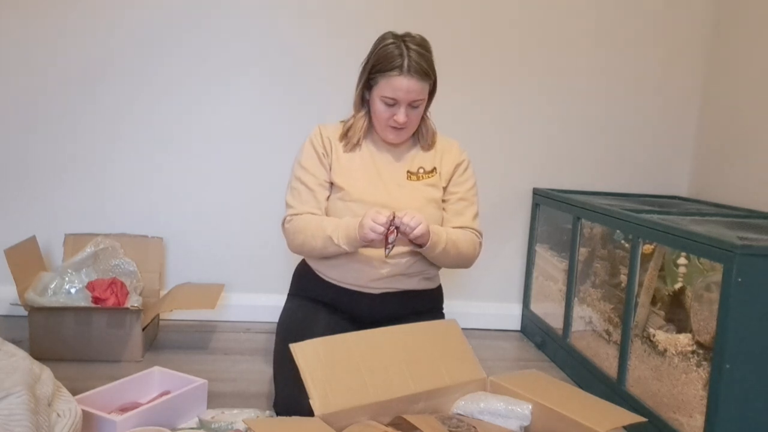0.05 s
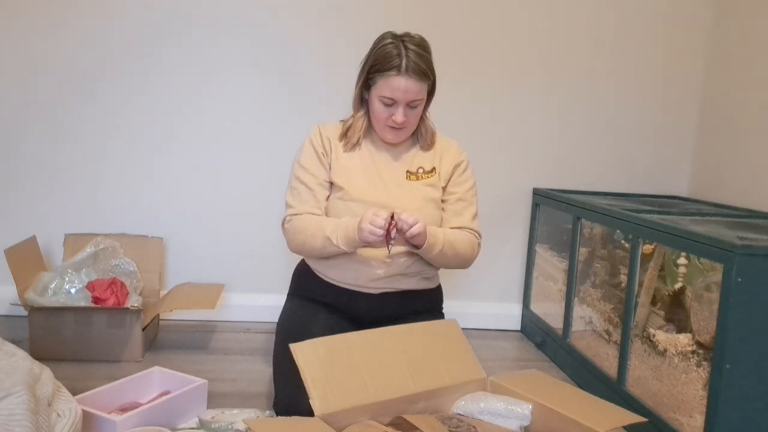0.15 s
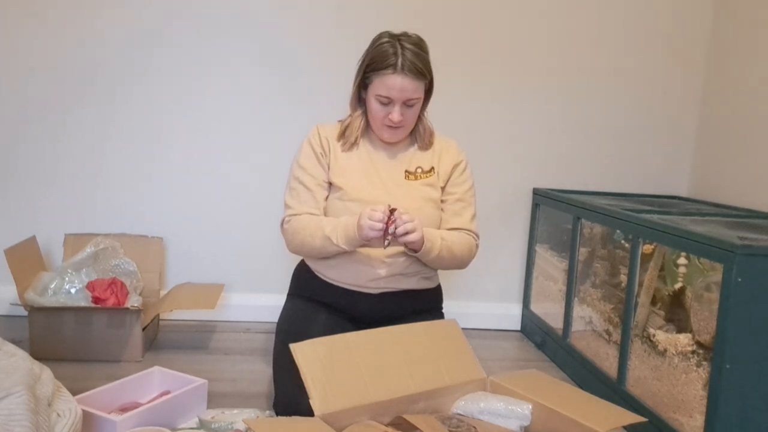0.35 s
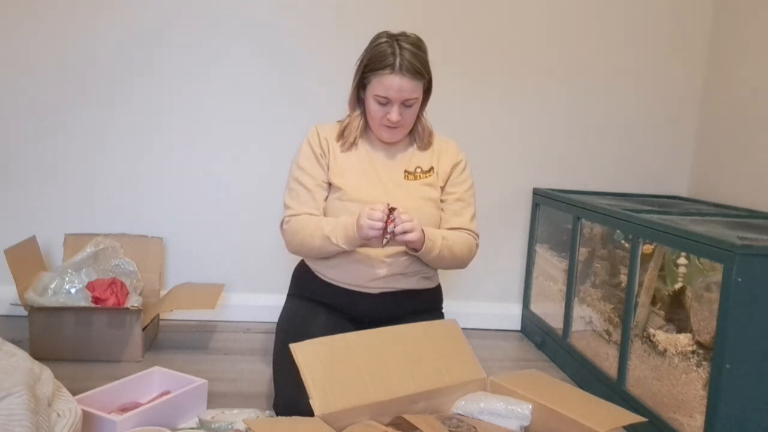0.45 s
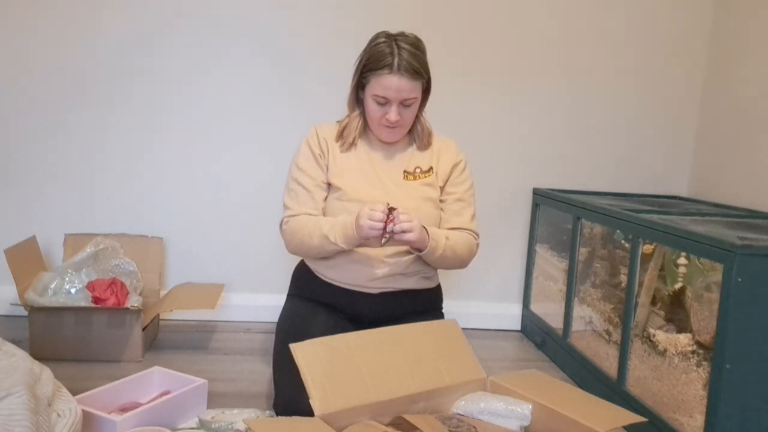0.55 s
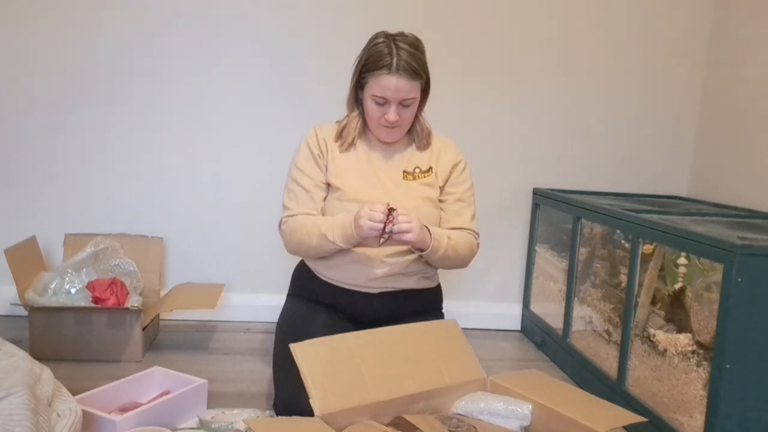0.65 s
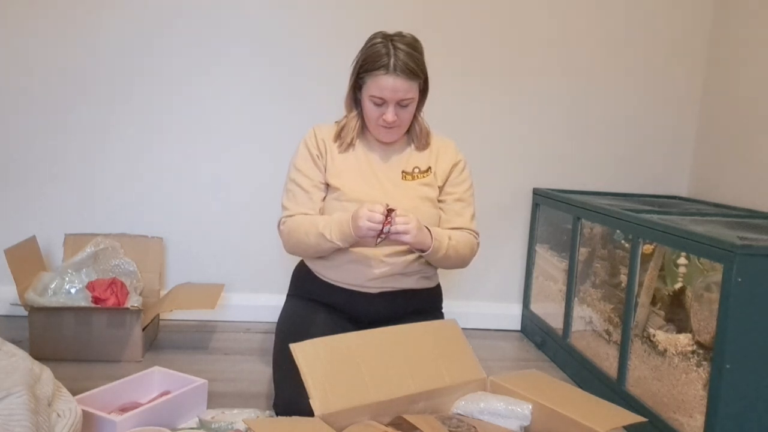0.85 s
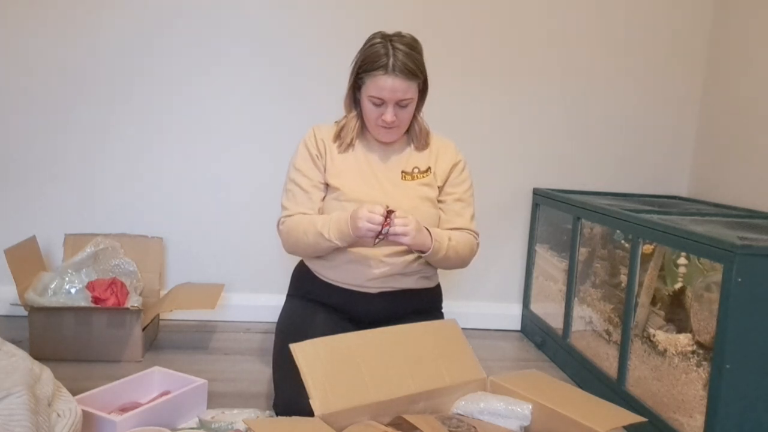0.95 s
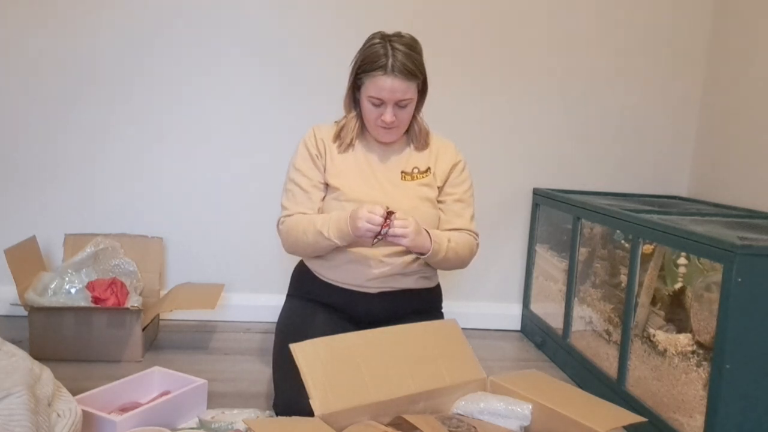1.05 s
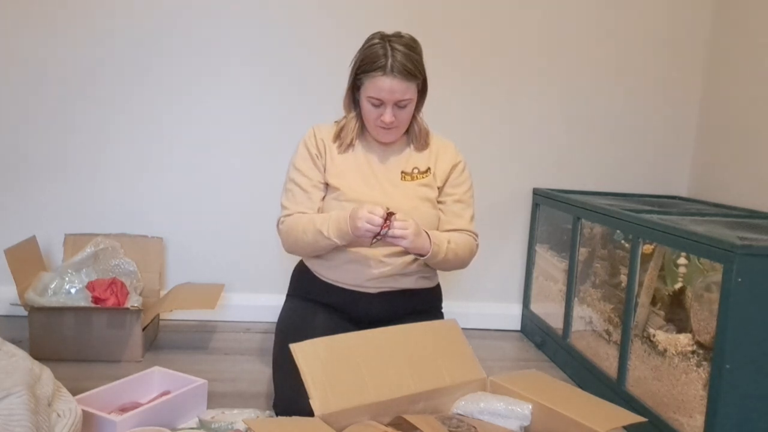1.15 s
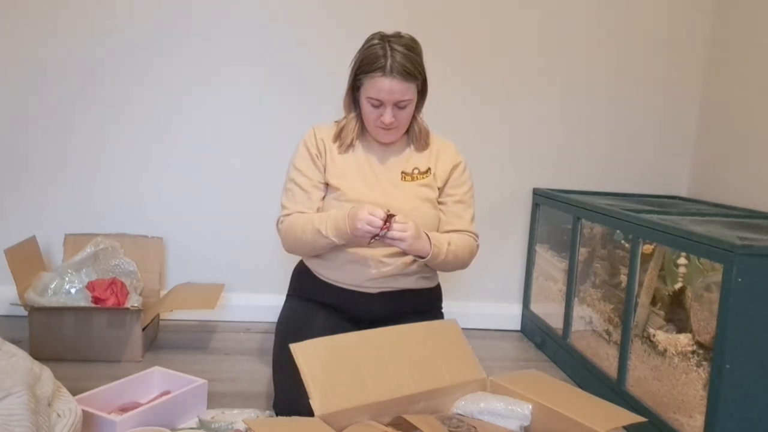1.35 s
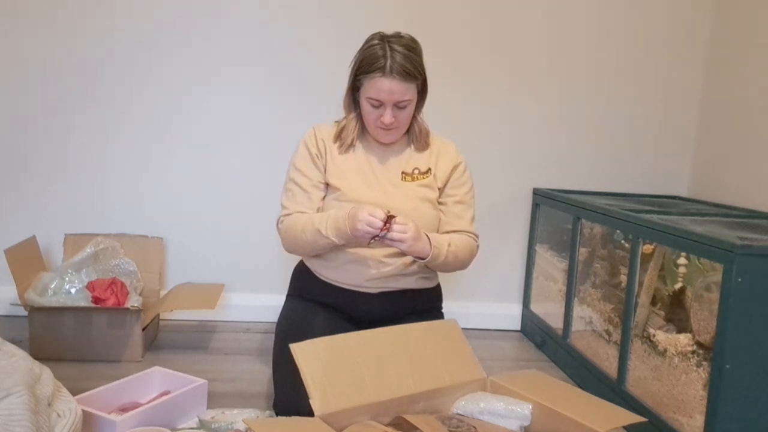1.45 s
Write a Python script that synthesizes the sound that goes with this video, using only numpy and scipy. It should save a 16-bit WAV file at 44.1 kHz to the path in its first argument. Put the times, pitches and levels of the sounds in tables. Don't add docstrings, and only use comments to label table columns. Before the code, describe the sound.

A small plastic packet is opened by hand: faint ticks, a quick burst of crisp pops, scattered crinkles, one loud late snap, then near quiet. Bare reverberant room, low rumble and faint hiss, stereo camera microphones about two metres away.

```python
import sys
import numpy as np
from scipy import signal
from scipy.fft import rfft, irfft
from scipy.io import wavfile

SR = 44100
rng = np.random.default_rng(int(sys.argv[2]) if len(sys.argv) > 2 else 0)


def transcribe(u):
    v = np.clip(np.atleast_2d(u).T, -1, 1)
    q = np.round(v * 32767).astype(np.int16)
    wavfile.write(sys.argv[1], SR, q)


def to_linear_factor(level_db):
    exponent = np.asarray(level_db, float) / 20
    return 10 ** exponent


N = 66150
HZ = np.fft.rfftfreq(1024, 1 / SR)

# time_s, level_db
RUMBLE_SWELL = [(0.0, -77), (0.032, -68.5), (0.188, -69), (0.228, -60.5), (0.33, -71), (0.366, -63),
                (0.546, -57.5), (0.63, -71), (0.7, -65.5), (0.894, -75.5), (0.922, -69), (1.202, -71),
                (1.252, -77.5), (1.282, -69.5), (1.416, -78), (1.436, -82.5), (1.5, -67.5)]
# pitch_hz, width_hz, level_db
RUMBLE_MODES = [(55, 24, -6.5), (69.2, 10.2, -4), (105, 36, -14), (146, 8.8, -7), (286, 256, -20)]
# pitch_hz, level_db
HUSH_COLOUR = [(200, 9), (700, 3), (1100, -6), (2000, -11.5), (3200, -13), (6000, -12.5), (9000, 0.5),
               (16000, -13)]
# pitch_hz, likeness (0 to 1)
LIKENESS = [(60, 0.85), (180, 1), (550, 0.57), (1650, 0.08), (4970, 0.017), (15000, 0.061)]
# time_s, level_db, dullness (0 to 1)
PULL = [(0, -55, 0.33), (0.021, -74, 0.87), (.18, -73.5, 0.7), (.205, -55.5, 0.86), (.26, -46.5, 0.33),
        (0.303, -47.5, 0.4), (.33, -71, 0.87), (.45, -64.5, 0.9), (.53, -72, 0.1), (.57, -110, 0.6),
        (0.647, -65, 0.6), (0.684, -52.5, 0.4), (.73, -62.5, 0.4), (.79, -65, 0.47), (.83, -90.5, 0),
        (1.17, -85, 0.5), (1.302, -96.5, 0.1), (1.5, -77.5, 0.56)]
# start_s, tick_level_db, ring_over_tick_db, patch_pitch_hz, tick_tilt_db_per_octave
SNAPS = [(0.0408, -32, 13.5, 1320, 0), (0.0417, -33, 15, 3760, 1), (0.1087, -32.5, 15, 926, -0.5),
         (0.1868, -23.5, 10.5, 7000, 5), (.2140, -11.5, 9, 2140, 0.5), (0.23, -16.5, -3, 2250, -8),
         (.2540, -11.5, 14, 793, -0.5), (0.2673, -16.5, 12.5, 1460, 5), (.2880, -10, 9, 1600, 1.5),
         (.3030, -27, 11, 1500, 12.5), (0.4083, -20, 13.5, 1680, -5), (0.4763, -21, -4, 3460, 2.5),
         (0.5012, -23.5, 8.5, 1630, 3.5), (0.5432, -32.5, 8, 2350, 7), (0.6643, -48.5, 31, 4000, 1),
         (0.6911, -27.5, 11.5, 5530, -1), (0.707, -28.5, 14, 2400, -2.5), (0.8963, -11, 8, 2010, 1),
         (1.0960, -54.5, 27.5, 2010, -1), (1.199, -40, 6.5, 5500, -5.5), (1.238, -43, 24, 2050, 1.5),
         (1.2532, -48, 24, 2010, -1), (1.2942, -46.5, 17.5, 6900, 5), (1.429, -51, 19.5, 6800, -2)]
# delay_s, left_level_db, right_level_db
ECHOES = [
    (.0075, -20, -13),
    (.009, -13, -26),
    (0.015, -20, -12),
    (0.017, -15, -14),
]
# pitch_hz, fade_s
WALL_FADE = [(500, 0.42), (1300, 0.29), (3500, 0.42), (9000, 0.29), (15000, 0.24)]
# pitch_hz, level_db
LEFT_MIC = [(400, -11.5), (1600, -5), (3100, -11), (5800, -6.5), (6700, -13.5), (10000, -16.5), (12200, -8),
            (14600, -19.5)]
# pitch_hz, level_db
RIGHT_MIC = [(400, -15.5), (1500, -1), (3800, 1), (4600, -7), (7400, 5.5), (8800, -6.5), (10700, -14.5),
             (13500, -5.5)]


def evened(x):
    return x / np.sqrt(np.mean(x ** 2) + 1e-20)


def read(points, hz):
    f, value = np.transpose(points)
    return np.interp(np.log(hz + 1), np.log(f + 1), value)


def alike_pair(left, other, hz):
    same = np.clip(read(LIKENESS, hz), -1, 1)
    same = same.reshape(-1, *[1] * (left.ndim - 1))
    return np.array([left, same * left + np.sqrt(1 - same ** 2) * other])


def noise_pair(db_of_hz):
    hz = np.fft.rfftfreq(N, 1 / SR)
    a, b, c, d = rng.standard_normal((len(hz), 4)).T
    waves = alike_pair(a + 1j * b, c + 1j * d, hz)
    return evened(irfft(waves * to_linear_factor(db_of_hz(hz)), N))


def rumble_colour(hz):
    power = 0
    for mode_hz, width_hz, db in RUMBLE_MODES:
        power = power + to_linear_factor(2 * db) / (1 + ((hz - mode_hz) / width_hz * 2) ** 4)
    return 10 * np.log10(power)


def rumble():
    s, db = np.transpose(RUMBLE_SWELL)
    swell = to_linear_factor(np.interp(np.arange(N) / SR, s, db))
    sides = to_linear_factor(np.array([[-1.9], [1.9]]))
    return swell * noise_pair(rumble_colour) * sides


def hush():
    return to_linear_factor(-68) * noise_pair(lambda hz: read(HUSH_COLOUR, hz))


def ring(hz, q):
    cycles = np.arange(1024) / SR * hz
    x = cycles * np.exp(-np.pi * cycles / q) * np.sin(2 * np.pi * cycles)
    return x / abs(rfft(x)).max()


def crackle():
    creases_per_s, spread_db, dull_db_per_oct = 3500, 4, -8.5
    s, db, dull = np.transpose(PULL)
    t = np.arange(N) / SR
    level = to_linear_factor(np.interp(t, s, db))
    dull = np.clip(np.interp(t, s, dull), 0, 1)
    draw = rng.random((N, 4))
    size = to_linear_factor(-spread_db * np.log(draw[:, 0] + 0.0028))
    happens = draw[:, 1] < creases_per_s / SR
    push_or_pull = np.sign(draw[:, 3] - .5)
    creases = level * evened(size * happens * push_or_pull)
    pitches = np.geomspace(700, 15000, num=16)
    patch = (draw[:, 2] * len(pitches)).astype(int)
    tilt_db_per_oct = dull_db_per_oct * (2 * dull - 1) + 3.65
    out = np.zeros(N)
    for k, hz in enumerate(pitches):
        grain = ring(hz, 2.0)
        grain = grain / np.linalg.norm(grain)
        share = to_linear_factor(tilt_db_per_oct * np.log2(hz / 4000))
        out += signal.oaconvolve(creases * share * (patch == k), grain)[:N]
    return out


def snaps():
    tick_s, patch_q, trim_db = .0009, 2.33, 5.5
    under_patch = 0.5
    flutter_colour = 0.26
    out = np.zeros(N + 2048)
    chance = rng.standard_normal((len(SNAPS), 64))
    swell = np.sin(np.pi * np.minimum(np.arange(64) / (tick_s * SR), 1)) ** 2
    for (s, db, ring_db, hz, tilt_db), flips in zip(SNAPS, chance):
        flutter = rfft(flips * swell, 1024)
        strength = abs(flutter)
        flutter = flutter / strength * evened(strength) ** flutter_colour
        tick = to_linear_factor(tilt_db * np.log2((HZ + 300) / 4000))
        patch = to_linear_factor(ring_db) * abs(rfft(ring(hz, patch_q)))
        bass_loss = 1 + (under_patch * hz / (HZ + 1)) ** 2
        snap = irfft(np.hypot(tick, patch) / bass_loss * flutter)
        snap = np.roll(snap, 256) * np.hanning(1024) ** .5
        at = round((s - tick_s / 2) * SR) - 256
        out[at:at + 1024] += to_linear_factor(db + trim_db) * snap
    return out[:N]


def symmetric_filter(db):
    return np.roll(irfft(to_linear_factor(db)), 512)[1:]


def beam(x):
    boost_db = 5 * np.exp(-np.log2((HZ + 1) / 7000) ** 2 / .21) - 3
    return signal.fftconvolve(x, symmetric_filter(boost_db), "same")


def early_echoes():
    early = np.zeros((2, 2048))
    early[:, 0] = to_linear_factor(np.array([-2, 0]))
    floor = (.0035, -3.5, -4.5)
    for k, (s, left_db, right_db) in enumerate([floor, *ECHOES]):
        at = round(s * SR)
        early[0, at + 7 * k + 9] += to_linear_factor(left_db)
        early[1, at] += to_linear_factor(right_db)
    return early


def tail():
    level_db, tilt_db_per_oct, rise_s = 8, -1, 0.012
    hz, t, z = signal.stft(rng.standard_normal((2, SR // 2)), SR, nperseg=256)
    z = alike_pair(z[0], z[1], hz)
    fade_db = -60 * t / read(WALL_FADE, hz)[:, None]
    tilt_db = tilt_db_per_oct * np.log2((hz[:, None] + 300) / 7000)
    x = signal.istft(z * to_linear_factor(fade_db + tilt_db), SR, nperseg=256)[1][:, :SR // 2]
    x = x * np.clip(np.arange(SR // 2) / SR / rise_s, 0, 1)
    return to_linear_factor(level_db) * x / np.linalg.norm(x, axis=1)[:, None]


def room(x):
    out = signal.fftconvolve(beam(x)[None], early_echoes(), axes=1)[:, :N]
    turn = np.arange(N) / SR * 45
    for k in range(3):
        share = np.sqrt(2 / 3) * np.cos(turn + k * np.pi / 3)
        out = out + signal.fftconvolve((x * share)[None], tail(), axes=1)[:, :N]
    return out


def microphones(air):
    mics = np.array([symmetric_filter(read(mic, HZ)) for mic in (LEFT_MIC, RIGHT_MIC)])
    return signal.fftconvolve(air, mics, "same", axes=1)


def scene():
    packet = snaps() + crackle()
    air = room(packet) + hush()
    return microphones(air) + rumble()


def top_cut(x):
    return signal.sosfilt(signal.butter(12, 16610, fs=SR, output="sos"), x)


def record(dry):
    low_pass = signal.firwin(255, 15800, window=("kaiser", 7), fs=SR)
    mix = signal.oaconvolve(dry, low_pass[None], "same")
    return top_cut(mix)


dry = scene()
out = record(dry)
transcribe(out)
```